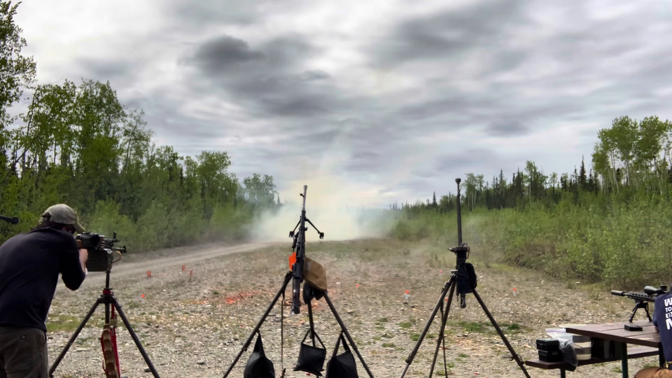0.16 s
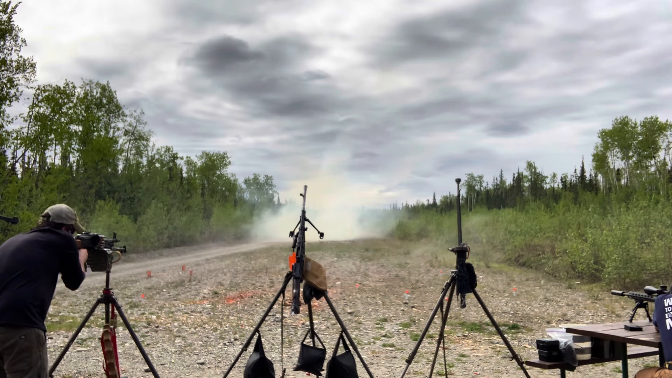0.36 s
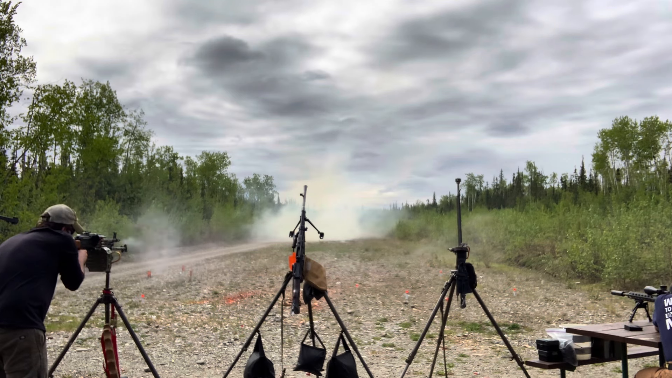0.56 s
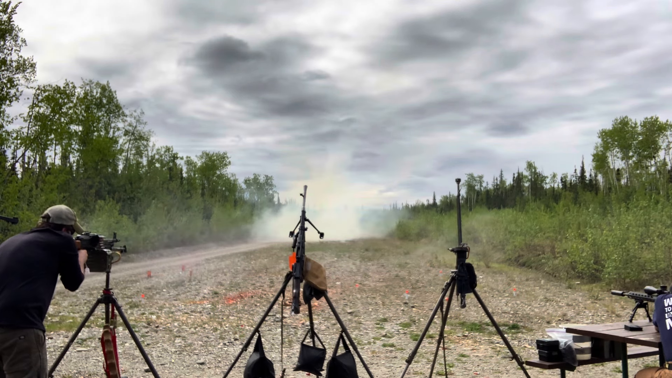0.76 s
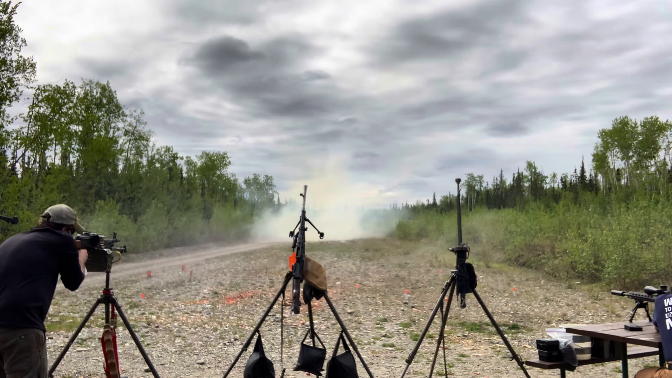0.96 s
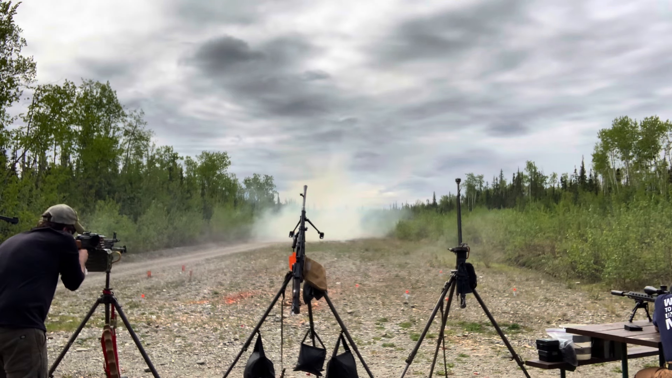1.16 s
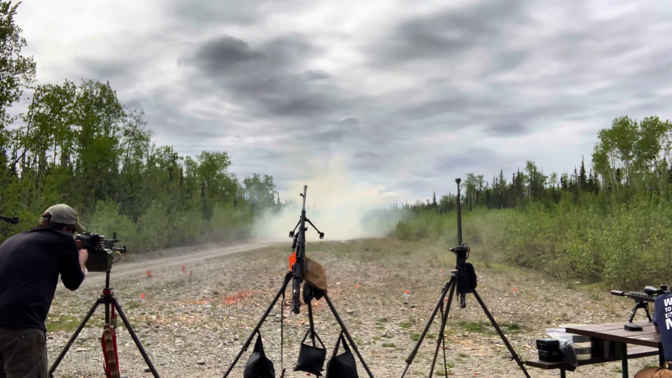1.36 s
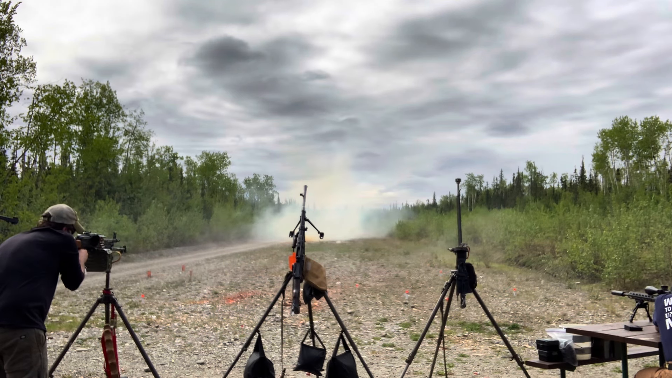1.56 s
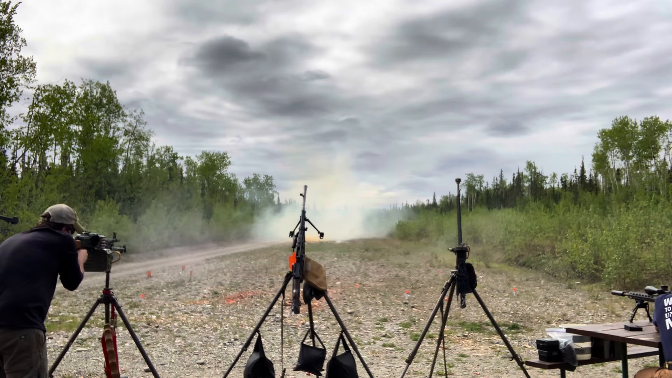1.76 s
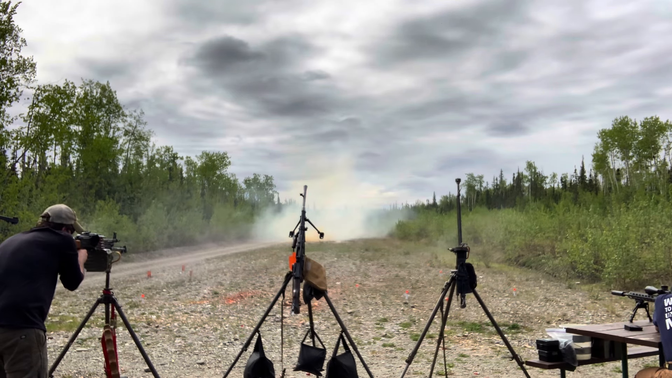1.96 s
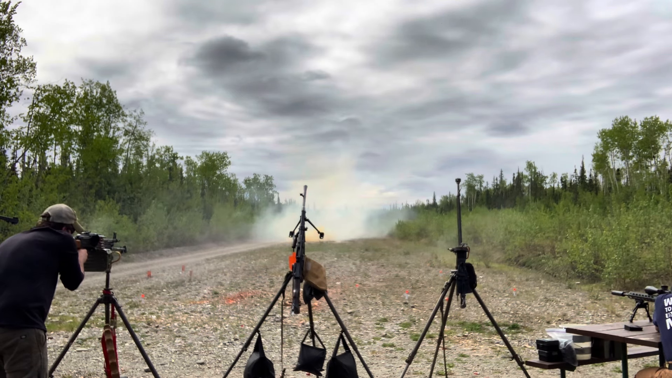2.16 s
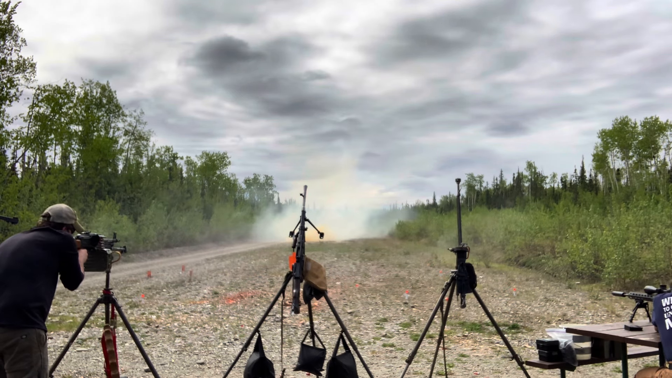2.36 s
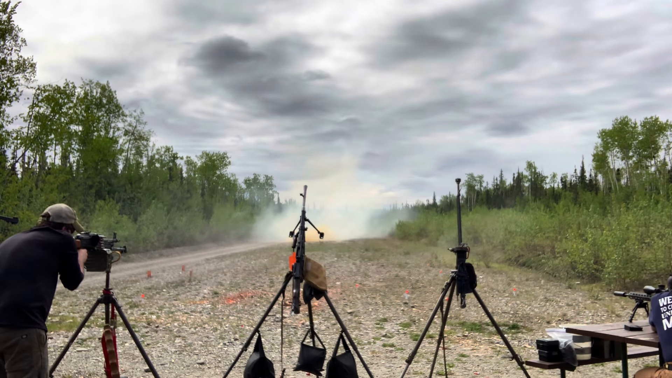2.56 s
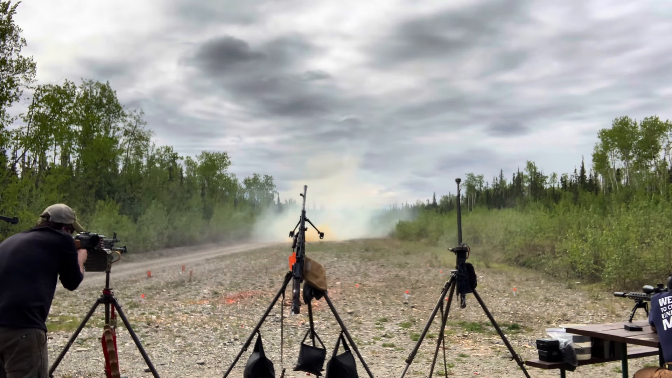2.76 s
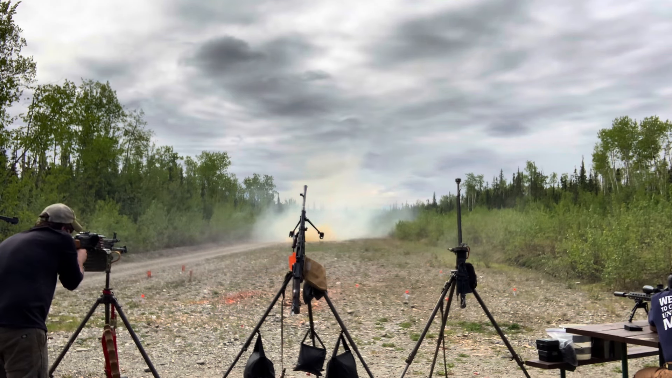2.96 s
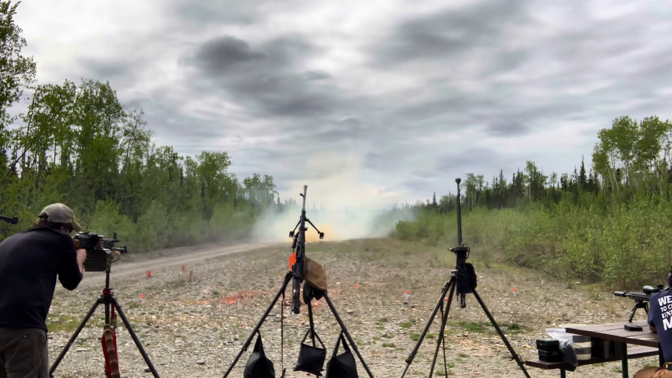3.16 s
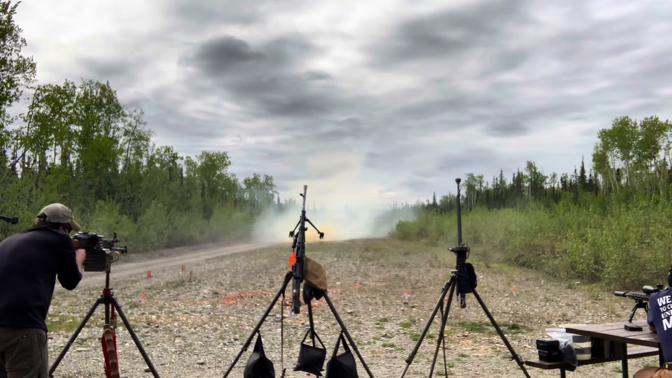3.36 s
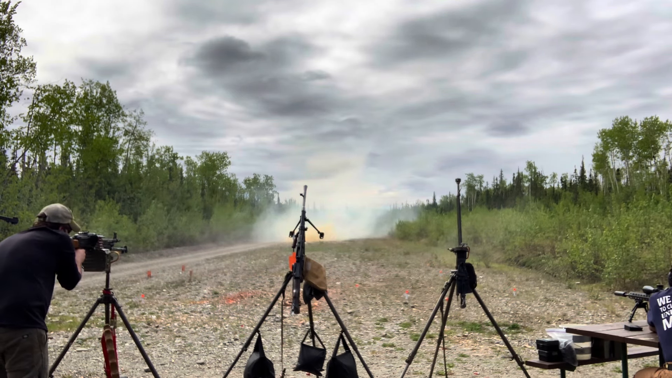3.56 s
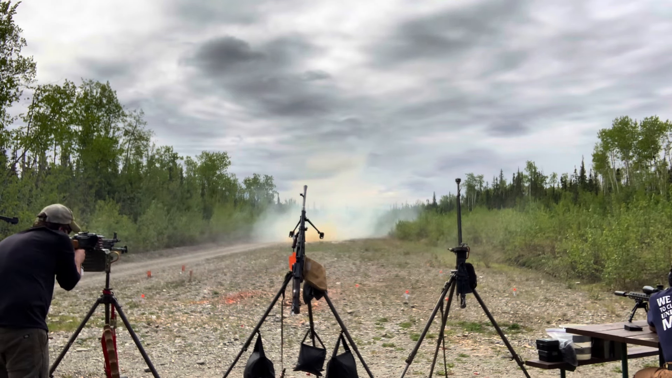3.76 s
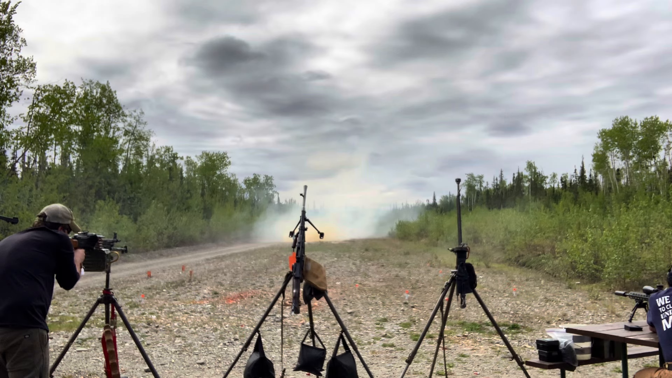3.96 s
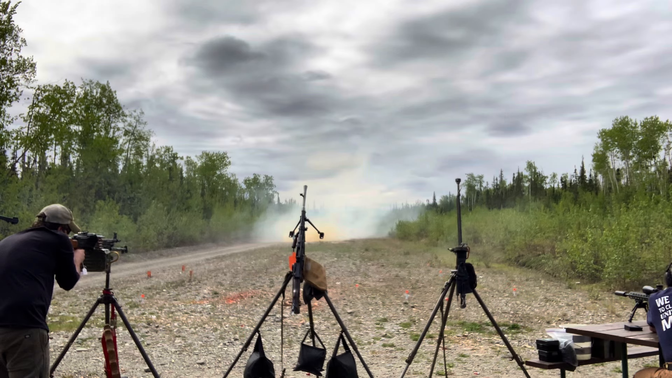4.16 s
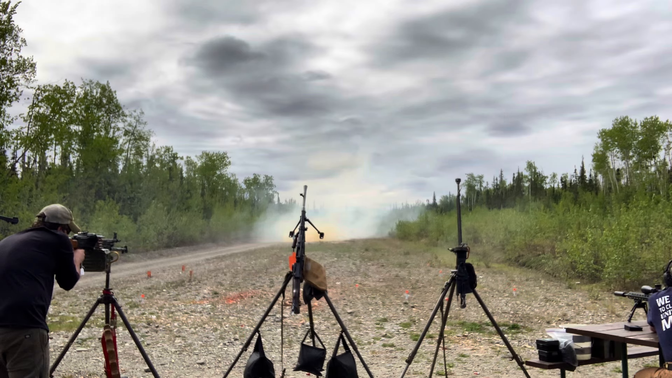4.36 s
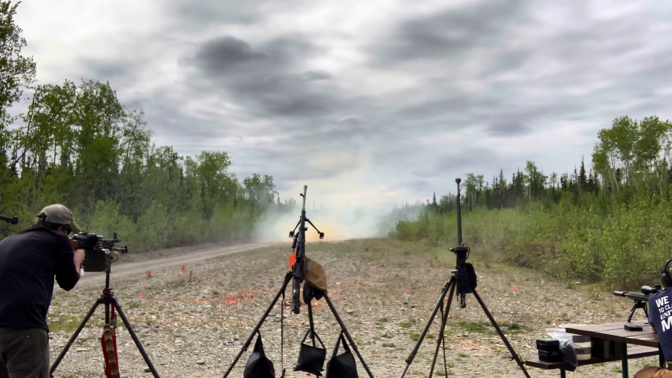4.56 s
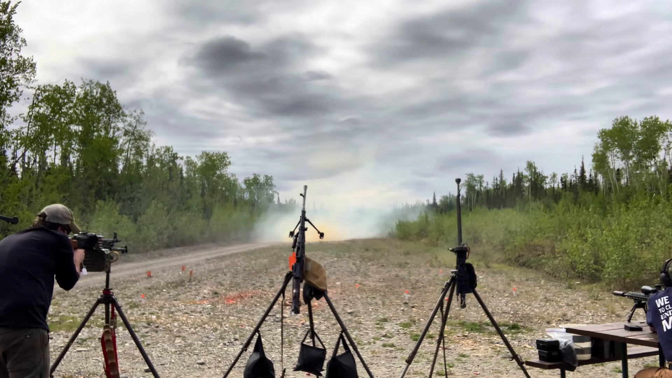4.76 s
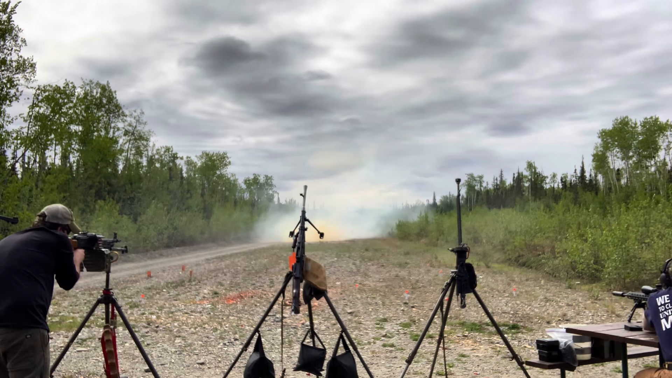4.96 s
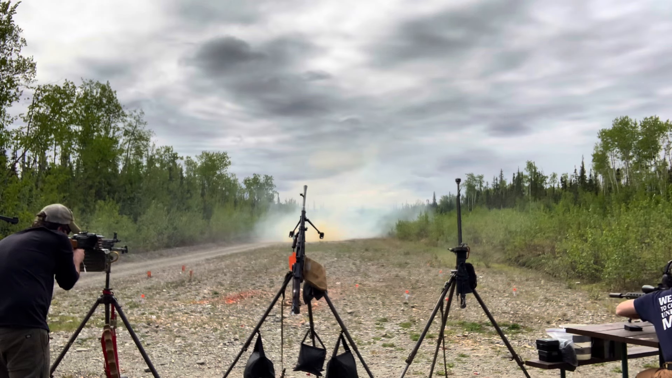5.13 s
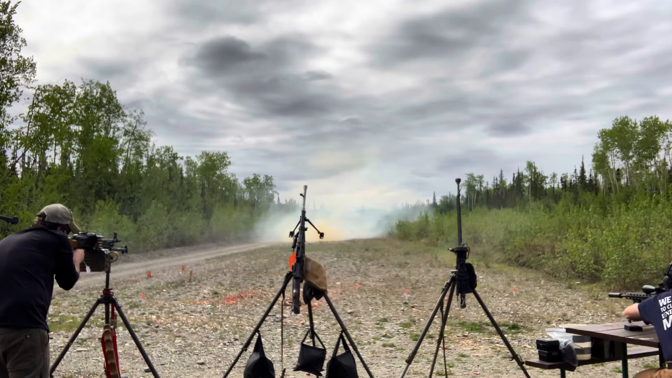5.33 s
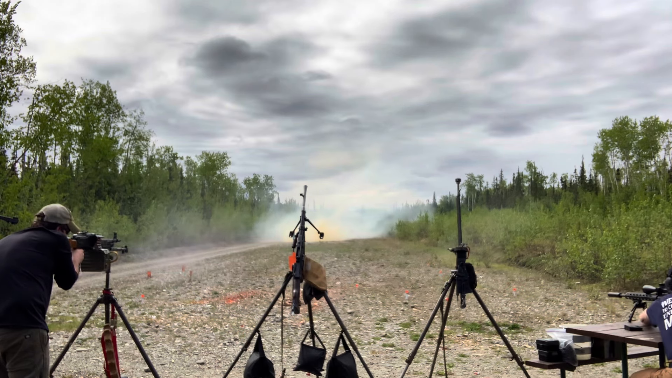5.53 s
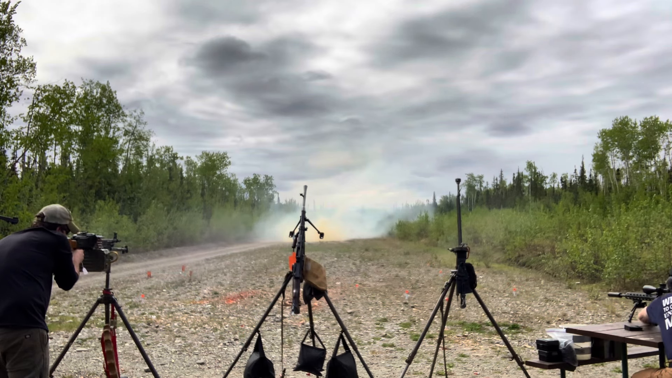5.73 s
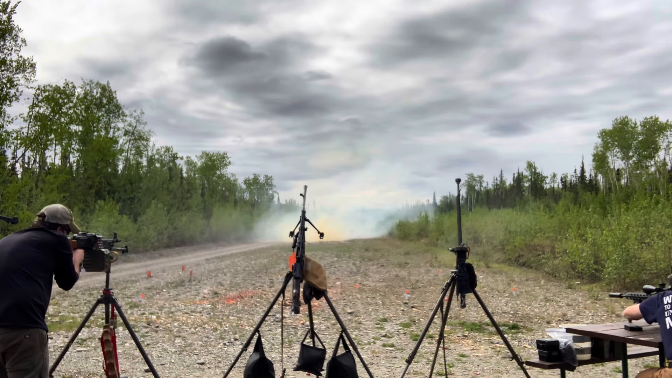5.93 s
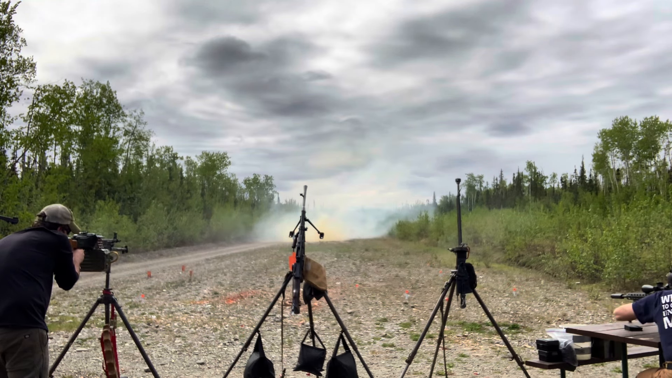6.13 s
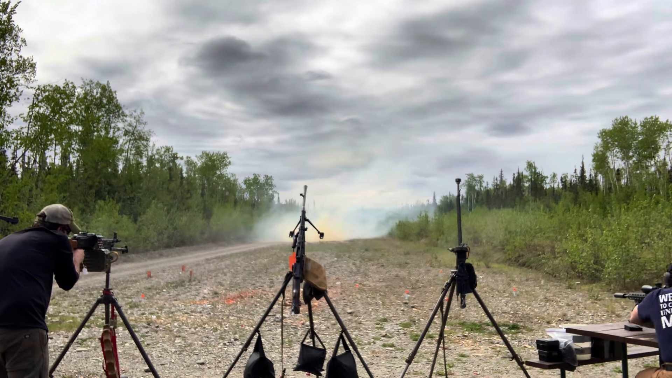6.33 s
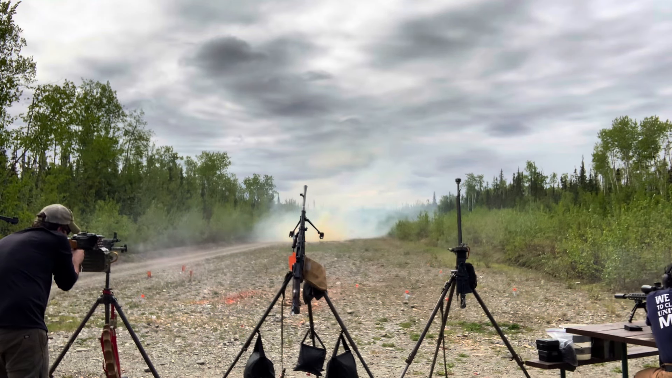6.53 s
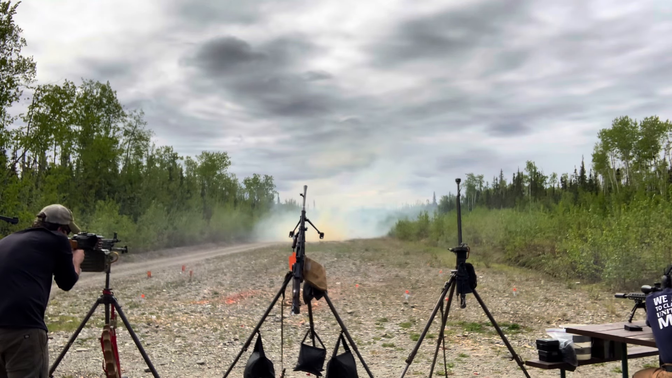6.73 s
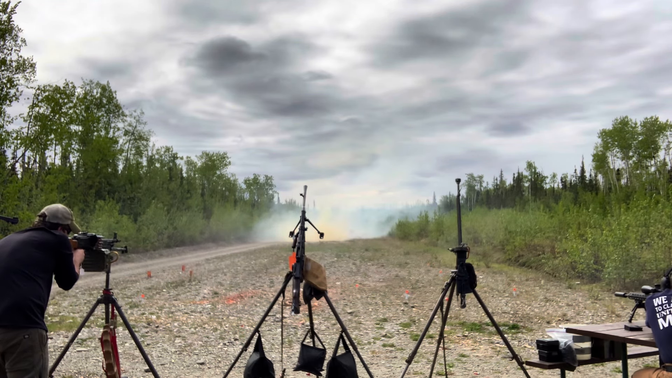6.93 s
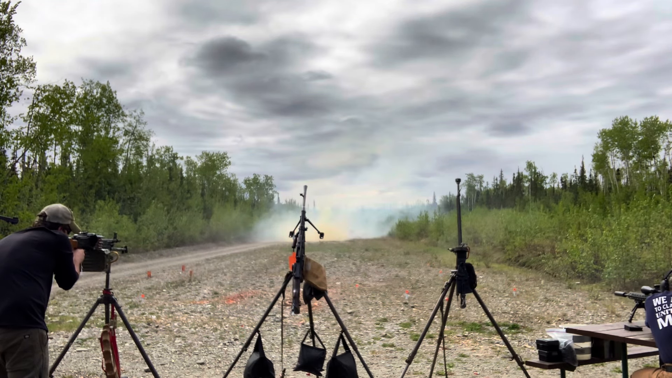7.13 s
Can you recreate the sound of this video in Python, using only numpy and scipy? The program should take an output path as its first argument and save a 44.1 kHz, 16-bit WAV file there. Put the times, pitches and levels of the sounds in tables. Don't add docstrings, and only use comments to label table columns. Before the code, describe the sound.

A wooded gravel range, heard close on a small stereo recorder, begins with the hissing echo of earlier fire. At 0.36 s a fast gun cracks three times, about 55 ms apart, overlapped by two heavier near shots at 0.5 s. A faint low boom swells at 0.84 s; brass tinkles thinly around 1.2 s. A bolt slams brightly at 1.4 s, then four fast rounds and another near pair run from 1.5 to 1.73 s. Targets explode at 1.72 and, hardest, 1.98 s, leaving a low rolling rumble. From 2.78 to 3.7 s the fast gun rips eighteen bright rounds. Echoes fade, with a faint case tinkle at 4.1 s. A slower gun hammers sixteen even rounds from 4.17 to 6.05 s, with dull trunk slaps; near pairs hit at 5.4 and 6.43 s, the last with a thumping blast, then echoes decay.

```python
import sys
import numpy as np
from scipy import signal
from scipy.fft import rfft, irfft
from scipy.io import wavfile
from scipy.ndimage import uniform_filter1d

SR = 44100
rng = np.random.default_rng(int(sys.argv[2]) if len(sys.argv) > 2 else 0)


def waveform_to_disk(signal):
    frames = np.transpose(np.atleast_2d(signal))
    scaled = np.clip(frames, -1, 1) * 32767
    samples = np.round(scaled).astype(np.int16)
    wavfile.write(sys.argv[1], SR, samples)


def to_linear_factor(level_db):
    exponent = np.asarray(level_db, float) / 20
    return 10 ** exponent


N = 317070

# start_s, crack_db (peak), thump_db, echo_db
BLASTS = [
    (1.716, -3.5, -15.5, -27),
    (1.978, 3, -6.5, -31),
    (6.439, -30, -19.5, -35.5),
]
# pitch_hz, level_db (per Hz)
FAST_CRACK = [(120, -39), (200, -9.5), (432, -8), (709, -18), (1180, -7), (2290, -16), (3190, -7),
              (4120, -13), (4860, -11), (7410, -13), (9230, -14.5), (10300, -11.5), (13600, -10),
              (14900, -8.5), (16000, -29)]
BOLT_S = 1.4055
RUN_UP_S = .02


def at_hz(points, hz):
    table_hz, value = np.array(points).T
    return np.interp(np.log(np.maximum(hz, 1)), np.log(table_hz), value)


def colour(x, spectrum):
    size = x.shape[-1]
    hz = np.arange(size // 2 + 1) * SR / size
    return irfft(rfft(x) * to_linear_factor(at_hz(spectrum, hz)), size)


def rms_one(x):
    return x / np.sqrt(np.mean(x ** 2) + 1e-20)


def drift(rate):
    knots = rng.standard_normal(400)
    return np.interp(np.arange(N) / SR * rate, np.arange(len(knots)), knots)


def add(out, sound, s):
    i = round(s * SR)
    out[:, i:i + sound.shape[1]] += sound[:, :N - i]


def all_shots():
    # start_s, crack_db (peak), thump_db
    fast_rounds = [(0.364, -2.5, -21.5), (0.421, -1.5, -21), (0.48, 0.5, -24.5), (1.502, 0, -22),
                   (1.557, -2, -37.5), (1.616, -0.5, -19.5), (1.673, -5.5, -22), (2.775, -2.5, -17.5),
                   (2.829, -0.5, -24), (2.886, -1, -22), (2.94, -6, -21.5), (2.997, -4.5, -29.5),
                   (3.05, -3, -25), (3.107, -1.5, -23.5), (3.16, -5, -22.5), (3.214, -3.5, -20),
                   (3.269, -4.5, -22), (3.323, -3.5, -23.5), (3.378, -5, -25), (3.432, -4.5, -23.5),
                   (3.487, -3.5, -25.5), (3.542, -5, -40), (3.595, -3.5, -24.5), (3.65, -5, -37),
                   (3.703, -5, -31)]
    # crack_db (peak), thump_db, echo_db, brightness_db (per octave)
    bolt_slam = (-13.5, -38.5, -42.5, -0.5)
    # start_s, crack_db (peak)
    slow_rounds = [(4.17, -8), (4.301, -6.5), (4.441, -8), (4.56, -6.5), (4.677, -7.5), (4.799, -8),
                   (4.918, -6.5), (5.038, -9), (5.166, -8), (5.29, -8.5), (5.41, -6.5), (5.544, -11),
                   (5.665, -10.5), (5.786, -8), (5.914, -9), (6.048, -8.5)]
    # start_s, crack_db (peak), thump_db, echo_db
    near_rounds = [
        (0.498, -4.5, -14, -28.5),
        (0.576, -6, -15, -26),
        (1.647, -4, -10.5, -35),
        (1.726, -5.5, -14, -38),
        (5.409, -4.5, -14, -27.5),
        (5.485, -5.5, -25, -26.5),
        (6.431, -1.5, -22, -21.5),
        (6.512, -6, -18, -44),
    ]
    fast = [(BOLT_S, *bolt_slam)]
    for s, crack_db, thump_db in fast_rounds:
        weaker_db = -23 - thump_db
        fast.append((s, crack_db, thump_db, -29.5 - .45 * weaker_db, 0.01 * weaker_db))
    near_s = np.transpose(near_rounds)[0]
    slow = []
    for s, crack_db in slow_rounds:
        ducked = np.any((near_s <= s) & (s < near_s + .3))
        slow.append((s, crack_db, -15.5 - 2 * ducked, -24 - 3.5 * ducked, 0))
    return sorted(fast), slow, [(*row, 0) for row in near_rounds], [(*row, 0) for row in BLASTS]


def banded_noise(spectrum, envelope, patchy_db):
    # pitch_hz, likeness (-1..1)
    likeness = [(60, 0.86), (180, 1), (550, -0.48), (1650, -0.2), (4970, -0.18), (15000, 0.11)]
    out, edges = 0, 28 * 2 ** np.arange(0, 9.4, .5)
    white = rng.standard_normal((2, 2, N))
    centres = np.sqrt(edges[1:] * edges[:-1])
    total = np.sqrt(np.sum(to_linear_factor(at_hz(spectrum, centres)) ** 2 * np.diff(edges)) * 2 / SR)
    for k, hz in enumerate(centres):
        band = signal.butter(2, edges[k:k + 2], "band", fs=SR, output="sos")
        mid, side = signal.sosfilt(band, white[k % 2])
        alike = np.clip(at_hz(likeness, hz), -1, 1)
        gain = to_linear_factor(at_hz(spectrum, hz) + patchy_db * drift(25)) * envelope(hz) / total
        stereo = np.sqrt(1 + alike) * mid + np.sqrt(1 - alike) * side * [[1], [-1]]
        out = out + gain * stereo * np.sqrt(.5)
    return out


def hush():
    # pitch_hz, level_db (per Hz)
    murmur = [(24, -63.5), (40, -27.5), (345, -16.5), (428, -10), (624, -15), (856, -13), (1250, -10.5),
              (1810, -18.5), (4500, -51), (5850, -73), (9900, -120)]
    return to_linear_factor(-48) * banded_noise(murmur, lambda hz: 1, patchy_db=0.2)


def far_boom():
    # centre_s, level_db, pitch_hz, length_s
    booms = [
        (0.84, -46, 45, .07),
    ]
    t, out = np.arange(N) / SR, 0
    for s, level_db, hz, length_s in booms:
        out = out + to_linear_factor(level_db) * np.sin(2 * np.pi * hz * (t - s)) * np.exp(-((t - s) / length_s) ** 2)
    return out


def blur(x, seconds):
    r = np.exp(-1 / (seconds * SR))
    return signal.lfilter([1 - r], [1, -r], x + 1e-18)


def decay(x, t60):
    return signal.lfilter([1], [1, -to_linear_factor(-120 / (t60 * SR))], x)


def woods():
    # pitch_hz, level_db (per Hz)
    echo_colour = [(18, -49), (30, -16.5), (255, -4.5), (298, -6), (467, -2.5), (1700, -15), (3570, -14.5),
                   (7280, -21.5), (7880, -40.5), (8760, -85.5), (9730, -70), (10800, -23), (13000, -29.5),
                   (14800, -35), (16500, -82)]
    # pitch_hz, t60_s
    clearing_t60 = [(40, 0.46), (90, 0.71), (200, .7), (500, 1.02), (1500, 1.65), (3500, 1.54),
                    (6000, 0.87), (11000, 0.76), (14000, 0.85)]
    # pitch_hz, level_db
    far_colour = [(60, -3.5), (200, -8), (450, 0), (800, 0.5), (1300, 6), (3000, 0), (12000, -40)]
    far_trees_db = [
        -68,
        -40.5,
        -33.5,
        -37,
    ]
    far_delay_s = .218
    power, far = np.zeros(N), np.zeros(N)
    power[0] = to_linear_factor(2 * -33)
    for shots, far_db in zip(all_shots(), far_trees_db):
        for s, _, _, echo_db, _ in shots:
            power[round(s * SR)] += to_linear_factor(2 * echo_db)
            far[round((s + far_delay_s) * SR)] += to_linear_factor(2 * far_db)
    far[round(.01 * SR)] += to_linear_factor(2 * -30.5)

    clearing = blur(power, 0.024)
    bushes = to_linear_factor(2 * 9.5) * decay(blur(power, 0.0073), 0.09)
    lumpy = to_linear_factor(2 * 0.0 * drift(45))
    answer = decay(blur(blur(far, 0.01), 0.01), 1.0) * lumpy

    def envelope(hz):
        late = to_linear_factor(2 * at_hz(far_colour, hz)) * answer
        return np.sqrt(decay(clearing, at_hz(clearing_t60, hz)) + bushes + late)
    return banded_noise(echo_colour, envelope, patchy_db=2.05)


def slaps(shots, paths):
    out, t = np.zeros((2, N)), np.arange(-512, 512) / SR
    lump_s, lump_hz, pitch_spread = 0.00495, 520, 0.16
    chances = rng.standard_normal((len(shots), len(paths), 2))
    for (s, *_), chance in zip(shots, chances):
        for k, ((delay_s, peak_db), (pitch, loud)) in enumerate(zip(paths, chance)):
            hz = lump_hz * (1 + pitch_spread * pitch)
            lump = np.sin(2 * np.pi * hz * t) * np.exp(-(t / lump_s) ** 2)
            lean = [[1], [0.32 + .5 * (-1) ** k]]
            add(out, to_linear_factor(peak_db + 2 * loud) * lump * lean, s + delay_s + t[0] + lump_s)
    return out


def slow_slaps(shots):
    # delay_s, peak_db
    paths = [
        (.162, -30),
        (.203, -23),
        (.262, -30.5),
    ]
    return slaps(shots, paths)


def near_slaps(shots):
    # delay_s, peak_db
    paths = [
        (.228, -26),
        (.243, -30),
        (.285, -28.5),
        (.36, -30),
    ]
    return slaps(shots, paths)


def rumble():
    t = np.maximum(np.arange(N) / SR - 2.06, 0)
    band = signal.butter(2, [45, 190], "band", fs=SR, output="sos")
    mid, side = signal.sosfilt(band, rng.standard_normal((2, N)))
    lump = to_linear_factor(-22.5 - 60 * t / 0.23)
    roll = to_linear_factor(-35 - 60 * t / 1.96 + 2.5 * drift(12))
    rise = np.clip(t / .014, 0, 1)
    return rise * (lump + roll) * (rms_one(mid) + 0.1 * rms_one(side) * [[1], [-1]])


def cases():
    # start_s, peak_db, pitch_hz
    bounces = [
        (1.1712, -60, 14900),
        (1.2094, -55, 15000),
        (1.2974, -54, 15000),
        (2.2294, -69.5, 14700),
        (2.3094, -78, 13500),
        (4.0994, -63, 14800),
    ]
    out, t = np.zeros((2, N)), np.arange(4000) / SR
    for s, peak_db, hz in bounces:
        ring = np.sin(2 * np.pi * hz * t) * np.exp(-t / 0.0148)
        add(out, to_linear_factor(peak_db) * ring * np.ones((2, 1)), s)
    return out


def bolt():
    t = np.arange(8192) / SR
    hz, level_db = np.transpose(FAST_CRACK)
    bright = np.transpose([hz, level_db + 9.5 * np.log2(hz)])
    noise = rms_one(colour(rng.standard_normal((2, len(t))), bright))
    rattle = np.exp(-np.maximum(t - .012, 0) / 0.0036)
    tail = to_linear_factor(-12) * np.exp(-t / 0.067)
    shape = np.clip(t / .003, 0, 1) * (rattle + tail)
    out = np.zeros((2, N))
    add(out, to_linear_factor(-26.5) * shape * (noise[0] + .4 * noise[1] * [[1], [-1]]), BOLT_S - .001)
    return out


def shocks():
    out, t = np.zeros((2, N)), np.arange(64) / SR
    length_s, late_s = .00033, .00122
    pulse = (1 - 2 * t / length_s) * np.clip((length_s - t) * SR + 1, 0, 1)
    for s, crack_db, *_ in BLASTS:
        add(out, to_linear_factor(crack_db - 5) * pulse * np.ones((2, 1)), s + late_s)
    return out


def gun(shots, crack, rise_s, hold_s, fall_s, wake_db, wake_s, wake_hz, alike, lead_s, late_s, second_db,
        start_hz, end_hz, spread_s, phase, thump_s, bell, thump_db, uneven, wobble, swell_s,
        bounce_s, bounce_hz, bounce_db):
    out, size = np.zeros((2, N)), 8192
    ears = np.array([[lead_s], [-lead_s]]) / 2
    t = np.arange(size) / SR + ears - RUN_UP_S
    after = np.maximum(t - rise_s - hold_s, 0)
    u = np.maximum(t - late_s, 0)

    front = np.clip(t / rise_s, 0, 1) ** 2
    burst = front * np.exp(-after / fall_s)
    smear = to_linear_factor(-18.5) * np.exp(-np.abs(t) / 0.0082)
    veil = signal.butter(6, 7500, fs=SR, output="sos")
    wake = to_linear_factor(wake_db) * front * np.exp(-(after / wake_s) ** bell)
    wake += to_linear_factor(second_db) * np.roll(burst, round(late_s * SR), axis=1)
    dull = signal.butter(1, wake_hz, fs=SR)
    bounce = np.sin(2 * np.pi * bounce_hz * u) * np.exp(-((u - bounce_s) / thump_s * 2) ** 2)
    thump_shape = np.exp(-(u / thump_s) ** bell) * (1 - np.exp(-u / swell_s)) ** 2
    cycles = start_hz * spread_s * np.log(1 + u / spread_s) + end_hz * u

    hz, level_db = np.transpose(crack)
    octaves = np.log2(hz / 2000)
    shift, alike = round(lead_s * SR), np.clip(alike, 0, 1)
    for s, crack_db, low_db, _, tilt_db in shots:
        ragged_db = (2.2 + 1.2 * uneven) * rng.standard_normal(len(hz))
        tilted = np.transpose([hz, level_db + tilt_db * octaves + ragged_db])
        shared, left, right = rms_one(colour(rng.standard_normal((3, size)), tilted))
        noise = alike * np.array([np.roll(shared, -shift), shared])
        noise = noise + np.sqrt(1 - alike ** 2) * np.array([left, right])
        pitch, turn, lean = uneven * rng.standard_normal(3)
        sweep = 2 * np.pi * (1 + 0.36 * wobble * pitch) * cycles
        thump = thump_shape * np.sin(sweep + phase + wobble * turn + lean * np.sign(ears) * .3)
        sharp = burst * noise + smear * signal.sosfilt(veil, noise) + wake * signal.lfilter(*dull, noise)
        low = thump + to_linear_factor(bounce_db) * bounce
        add(out, to_linear_factor(crack_db - 7.0) * sharp + to_linear_factor(low_db + thump_db) * low, s - RUN_UP_S)
    return out


def target_blasts(shots):
    # pitch_hz, level_db (per Hz)
    crack = [(150, -30), (250, -6.5), (452, -11.5), (922, -25.5), (2400, -24), (3340, -32), (3840, -21),
             (6470, -33), (8850, -56), (12800, -33), (16000, -69)]
    return gun(shots, crack, rise_s=0.00077, hold_s=0.00014, fall_s=0.0003,
               wake_db=-12.5, wake_s=0.081, wake_hz=2000,
               alike=0.63, lead_s=-0.00029, late_s=0.00018, second_db=-39,
               start_hz=715, end_hz=24.9, spread_s=0.0016, phase=2.7, wobble=0.77, swell_s=.003,
               thump_s=0.03, bell=5.5, thump_db=5.5, uneven=0.086,
               bounce_s=0.062, bounce_hz=141.0, bounce_db=-7.5)


def slow_gun(shots):
    # pitch_hz, level_db (per Hz)
    crack = [(470, -36), (800, 1), (1390, -1.5), (2020, -7), (3560, -1.5), (3830, -3), (5180, -9.5),
             (6650, -7), (7260, -66), (8030, -3.5), (12800, -27), (14700, -19), (16000, -30)]
    return gun(shots, crack, rise_s=0.00055, hold_s=0.0029, fall_s=0.0043,
               wake_db=-10.0, wake_s=0.0052, wake_hz=5000,
               alike=0.85, lead_s=.00028, late_s=.00002, second_db=-32.0,
               start_hz=1183, end_hz=0, spread_s=.0012, phase=.55, wobble=1, swell_s=0.0015,
               thump_s=0.0069, bell=0.93, thump_db=12.5, uneven=0.024,
               bounce_s=0.018, bounce_hz=100, bounce_db=-28.0)


def near_gun(shots):
    # pitch_hz, level_db (per Hz)
    crack = [(59, -37), (100, -20.5), (389, -10), (1010, -12), (1170, -11), (1760, -18), (2370, -14.5),
             (2990, -27), (3540, -20.5), (6020, -18.5), (7610, -27), (8640, -21.5), (10700, -22),
             (13500, -17), (16000, -38)]
    return gun(shots, crack, rise_s=0.0009, hold_s=0.0033, fall_s=0.0042,
               wake_db=-3, wake_s=0.059, wake_hz=2530,
               alike=0.67, lead_s=.0003, late_s=0.008, second_db=-4.0,
               start_hz=702, end_hz=40, spread_s=0.0018, phase=.3, wobble=.6, swell_s=0.00099,
               thump_s=0.015, bell=6.0, thump_db=-1.5, uneven=0.64,
               bounce_s=0.052, bounce_hz=71, bounce_db=-5.0)


def fast_gun(shots):
    return gun(shots, FAST_CRACK, rise_s=0.0019, hold_s=0.0018, fall_s=0.0023,
               wake_db=-6.0, wake_s=0.015, wake_hz=6000,
               alike=0.83, lead_s=.00023, late_s=.006, second_db=-20.0,
               start_hz=270, end_hz=30, spread_s=.003, phase=.5, wobble=.4, swell_s=0.0025,
               thump_s=0.017, bell=1.12, thump_db=12, uneven=0.87,
               bounce_s=0.039, bounce_hz=60, bounce_db=-21.5)


def scene():
    fast_shots, slow_shots, near_shots, blast_shots = all_shots()
    clearing = hush() + far_boom() + woods() + rumble()
    trunks = slow_slaps(slow_shots) + near_slaps(near_shots)
    metal = cases() + bolt()
    blasts = target_blasts(blast_shots) + shocks()
    guns = slow_gun(slow_shots) + near_gun(near_shots) + fast_gun(fast_shots)
    return clearing + trunks + metal + blasts + guns


def thin_top(x):
    hz, _, lines = signal.stft(x, SR, nperseg=1024)
    power, top = np.abs(lines) ** 2, hz > 10300
    level = np.sqrt(power[top].sum(axis=0))
    steady = level < to_linear_factor(3.5) * np.minimum(np.roll(level, 1), np.roll(level, 2))
    weak = power < 1.2 ** 2 * uniform_filter1d(power, size=16, axis=0)
    lines[weak & top[:, None] & steady] = 0
    return signal.istft(lines, SR, nperseg=1024)[1][:N]


def top_cut(x):
    return signal.sosfilt(signal.butter(12, 16800, fs=SR, output="sos"), x)


def record(dry):
    # pitch_hz, level_db
    left_lean = [(60, -0.5), (180, -0.5), (550, 1), (1650, -1), (4970, -1), (15000, 0.5)]
    # pitch_hz, level_db
    mid_colour = [(7500, 0), (8000, -13), (10100, -13), (10400, 0), (15800, 0), (16100, -13)]
    # pitch_hz, level_db
    side_colour = [(60, 4.5), (150, 7.5), (300, -0.5), (1000, -0.5), (6000, -2), (8000, 4), (10000, 4),
                   (11500, -1.5), (12500, -8), (13200, -15), (16000, -11.5)]
    left, right = np.tanh(dry / 1.1) * 1.1
    half_lean = np.array(left_lean) * [1, .5]
    left, right = colour(left, half_lean), colour(right, half_lean * [1, -1])
    mid = thin_top(colour((left + right) / 2, mid_colour))
    side = colour((left - right) / 2, side_colour)
    x = signal.sosfilt(signal.butter(2, 28, "high", fs=SR, output="sos"), [mid + side, mid - side])
    x = signal.sosfilt(signal.cheby2(12, 70, 16900, fs=SR, output="sos"), x)
    return top_cut(x)


dry = scene()
out = record(dry)
waveform_to_disk(out)
```